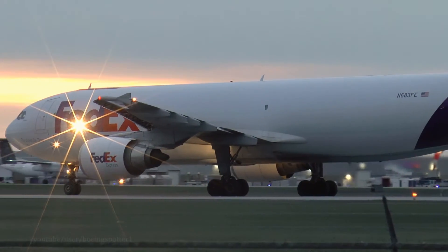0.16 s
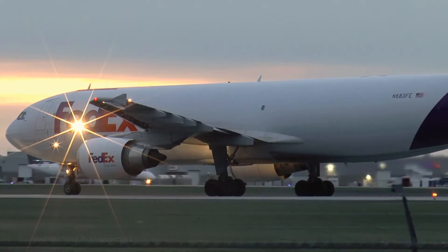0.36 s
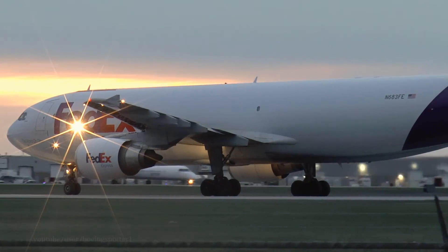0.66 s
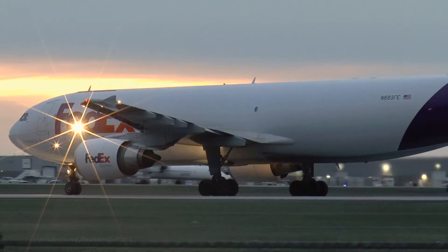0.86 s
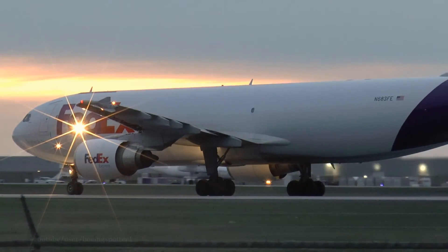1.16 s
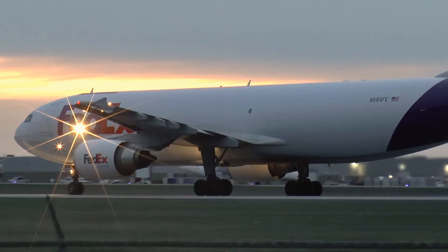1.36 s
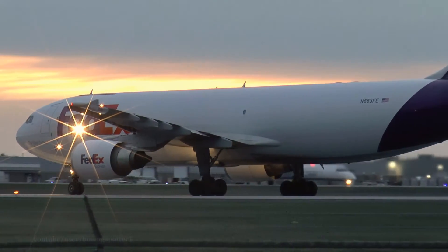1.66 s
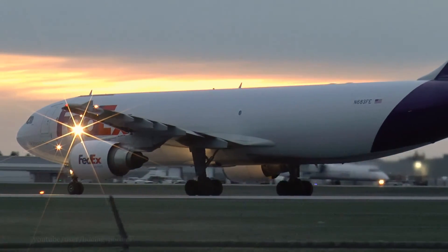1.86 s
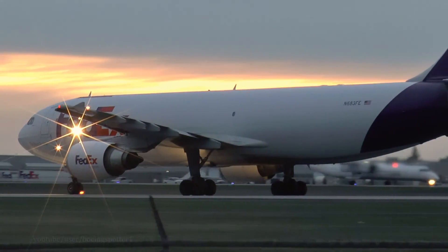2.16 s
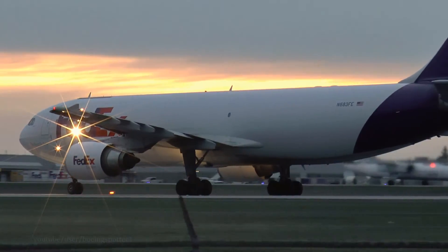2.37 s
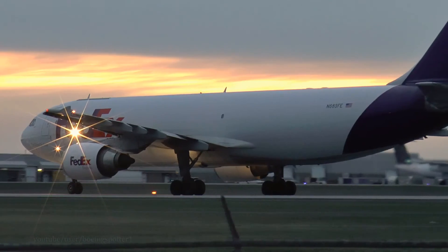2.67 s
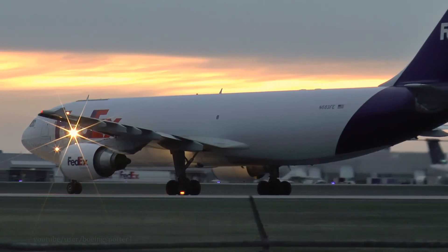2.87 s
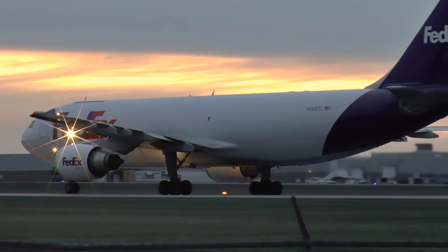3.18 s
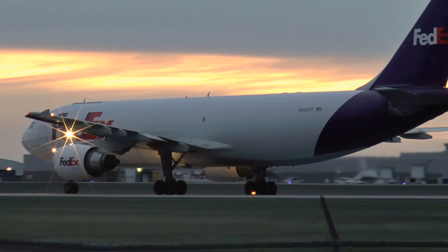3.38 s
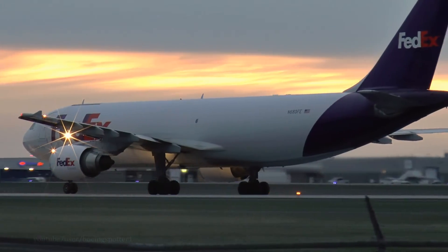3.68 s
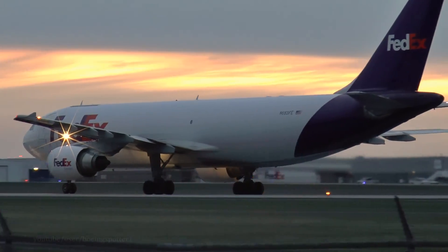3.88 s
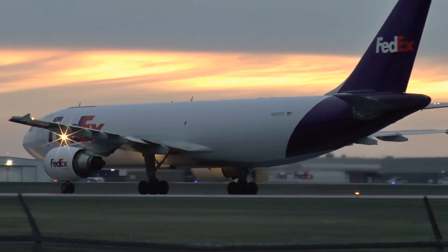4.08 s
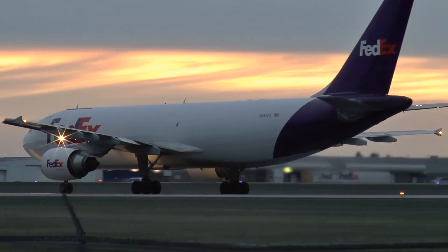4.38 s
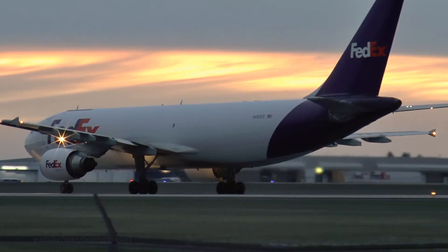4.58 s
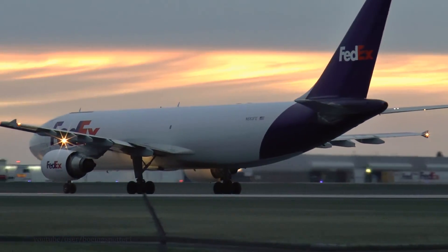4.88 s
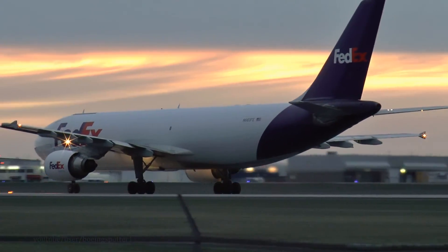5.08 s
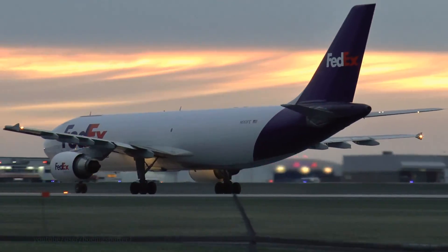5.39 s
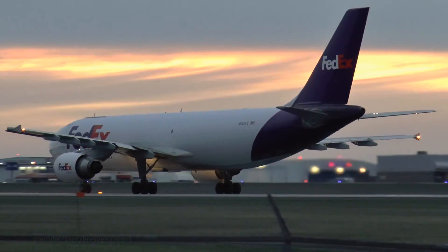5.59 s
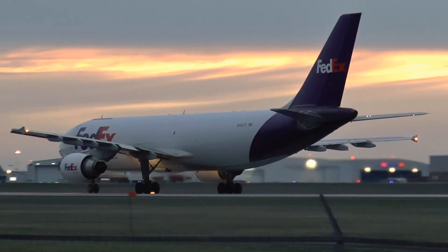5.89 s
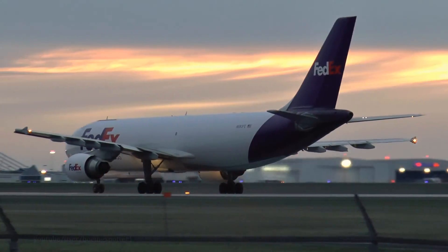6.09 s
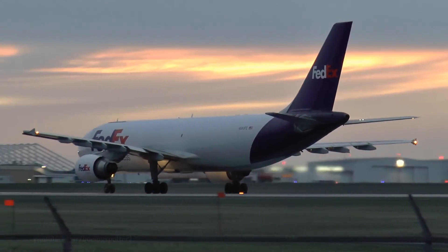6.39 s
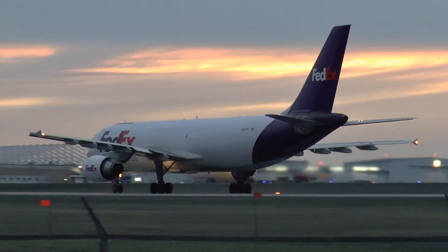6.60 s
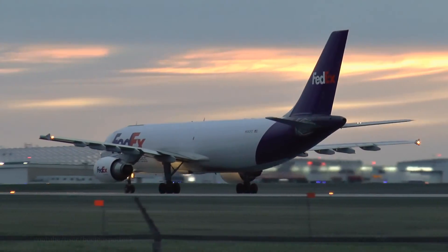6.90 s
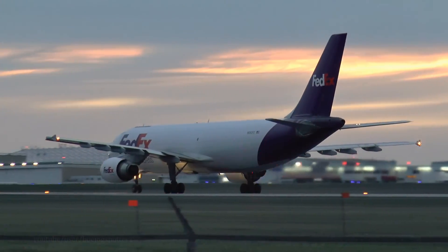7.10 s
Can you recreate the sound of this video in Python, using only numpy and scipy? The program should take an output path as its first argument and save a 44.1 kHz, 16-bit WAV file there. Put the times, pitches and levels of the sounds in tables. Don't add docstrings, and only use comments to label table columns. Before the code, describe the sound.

A large twin-jet airliner rolls past on takeoff with a rising fan whine and a deep, crackling, overloaded rumble that grows duller as it recedes.

```python
import sys
import numpy as np
from scipy import signal
from scipy.fft import rfft, irfft, next_fast_len
from scipy.io import wavfile

SR = 44100
rng = np.random.default_rng(int(sys.argv[2]) if len(sys.argv) > 2 else 0)


def invert_db(level):
    return 10 ** (np.asarray(level, dtype=float) / 20)


def to_wav(sig):
    pcm = np.clip(np.atleast_2d(sig), -1, 1) * 32767
    pcm = np.round(pcm).astype(np.int16)
    wavfile.write(sys.argv[1], SR, pcm.T)


N = 319725


def rms_one(x):
    return x / np.sqrt(np.mean(x ** 2) + 1e-20)


def in_time(rows):
    time_s, *columns = np.transpose(rows)
    return [np.interp(np.arange(N) / SR, time_s, column) for column in columns]


def at_hz(points, hz):
    table_hz, table_db = np.transpose(points)
    return np.interp(np.log(hz + 1e-9), np.log(table_hz), table_db)


def drift(rate_hz):
    r = np.exp(-80 * np.pi * rate_hz / SR)
    slow = signal.lfilter([1], [1, -2 * r, r * r], rng.standard_normal(N // 40 + 2002))[2000:]
    return np.interp(np.arange(N) / 40, np.arange(len(slow)), rms_one(slow))


def one_pole(x, seconds):
    r = np.exp(-1 / (seconds * SR))
    return signal.lfilter([1 - r], [1, -r], x)


def white():
    size = next_fast_len(N)
    return rfft(rng.standard_normal(size)), np.arange(size // 2 + 1) * SR / size, size


# time_s, level_db
RUMBLE_LEVEL = [
    (0.0, -19.5),
    (0.5, -17),
    (1.0, -16),
    (2.0, -14.5),
    (3.0, -14.5),
    (3.7, -12.5),
    (4.6, -16.5),
    (5.9, -16),
    (6.7, -16),
    (7.25, -15),
]
# pitch_hz, level_db (per Hz)
RUMBLE_NEAR_SPECTRUM = [(15, -20.5), (25, -12), (40, -9.5), (60, -5.5), (85, -0.5), (120, -1.5),
                        (160, -5.5), (200, -6.5), (250, -16), (330, -37.5)]
# pitch_hz, level_db (per Hz)
RUMBLE_FAR_SPECTRUM = [(15, -11.5), (25, -7.5), (40, -6), (60, 2), (85, 2), (120, -5.5), (160, -9),
                       (200, -19), (250, -27), (330, -45)]
# time_s, gain_drop_db (negative:
STRONG_CRESTS = [(0.3735, 5.5, -1), (0.615, 0.5, -1), (0.8669, 1.45, -1), (1.0386, 2, -1), (1.3311, 3, -1),
                 (1.4984, 1, 1), (1.7323, 2.5, -1), (1.8558, 2, -1), (2.1089, 2, -1), (2.2396, 1.5, -1),
                 (2.3581, 2.5, -1), (2.458, 1, -1), (2.6142, 1, -1), (2.8608, 3, -1), (3.2086, 1.5, -1),
                 (3.3896, 2.5, 1), (3.517, 1.8, 1), (3.699, 2, -1), (3.8546, 0.9, -1), (4.1106, 1.5, -1),
                 (4.737, 1.5, 1), (4.9024, 2.5, -1), (5.1828, 3, -1), (5.347, 1, -1), (5.654, 3.5, -1),
                 (6.0966, 3.2, -1), (6.6688, 0.4, 1), (6.716, 1.5, 1), (6.8372, 4, -1), (7.2485, -1.5, -1)]
CREST_HZ, CREST_SINK_HZ_PER_S = 110, 3.0
CEILING, BOTTOM = 0.61, -0.5


def rumble(crest_cycles, crest_db, per_db, swing):
    noise, hz, size = white()
    noise = noise * (hz < 345)
    near = rms_one(irfft(noise * invert_db(at_hz(RUMBLE_NEAR_SPECTRUM, hz)), size)[:N])
    far = rms_one(irfft(noise * invert_db(at_hz(RUMBLE_FAR_SPECTRUM, hz)), size)[:N])
    farness = 1.075 * np.linspace(0, 1, N) ** 0.67 - 0.1
    eddies = near + farness * (far - near)

    swell = np.sqrt(signal.filtfilt(*signal.butter(1, 18.0, fs=SR), eddies ** 2).clip(0))
    eddies = rms_one(eddies / (1 + (swell / swing) ** 4) ** 0.17)
    eddies = signal.sosfilt(signal.butter(3, 31.0, "high", fs=SR, output="sos"), eddies)
    out = invert_db(in_time(RUMBLE_LEVEL)[0] + 3.5) * eddies

    around = np.arange(-1500, 1500)
    t = around / SR
    gain = gain_control()
    for time_s, drop_db, direction in STRONG_CRESTS + lesser_crests():
        crest_hz = CREST_HZ - CREST_SINK_HZ_PER_S * time_s
        at = round(time_s * SR) + around
        window = np.exp(-0.5 * (t * crest_hz / crest_cycles) ** 2)
        limit = CEILING if direction > 0 else BOTTOM
        height = invert_db(crest_db + per_db * drop_db) * limit / gain[at[1200]]
        crest = height * np.cos(2 * np.pi * crest_hz * t)
        inside = at < N
        at = at[inside]
        out[at] += window[inside] * (crest[inside] - out[at])
    return out


def lesser_crests():
    strong_s = np.array(STRONG_CRESTS)[:, 0]
    rows, time_s = [], 0
    for spread, side in rng.random((80, 2)):
        time_s += 0.09 * 1.18 ** time_s * (0.5 + spread)
        clear = abs(strong_s - time_s).min() > 0.035
        if clear and 0.04 < time_s < N / SR - 0.05:
            rows.append((time_s, 0, 1 if side < 0.15 else -1))
    return rows


# time_s, level_db, distance (0 near, 1 far)
ROAR_PATH = [
    (0.0, -29.5, 0.028),
    (0.58, -27.5, 0.075),
    (2.5, -29.5, 0.52),
    (3.1, -29.5, 0.55),
    (3.9, -31.5, 0.82),
    (4.55, -32.5, 0.94),
    (5.15, -33.5, 0.83),
    (6.2, -36, 0.86),
    (6.65, -33, 0.91),
    (7.25, -36, 0.9),
]
# pitch_hz, level_db (per Hz)
ROAR_NEAR_SPECTRUM = [(300, -9.5), (700, -5), (1250, -0.5), (1650, -2), (2200, -10.5), (2800, -11.5),
                      (3600, -9), (4100, -17.5), (5000, -23), (5500, -27.5), (6200, -31.5), (6800, -33.5),
                      (8500, -47.5), (11000, -68.5)]
# pitch_hz, level_db (per Hz)
ROAR_FAR_SPECTRUM = [(300, -5), (700, -4.5), (1250, 0.5), (1650, 1), (2200, -4), (2800, -9), (3600, -13),
                     (4100, -22.5), (5000, -33.5), (5500, -37.5), (6200, -42.5), (6800, -48.5),
                     (8500, -59.5), (11000, -63)]


def roar(patchy_db, gusty_db):
    level_db, far = in_time(ROAR_PATH)
    far = np.clip(far, -0.3, 1.3)
    noise, hz, size = white()
    midway_db = 0.5 * (at_hz(ROAR_NEAR_SPECTRUM, hz) + at_hz(ROAR_FAR_SPECTRUM, hz))
    noise = noise * invert_db(midway_db)
    band_place = 3 * np.log2(hz / 280 + 1e-9)
    out, power, gust = 0, 0, drift(3.6)
    for k in range(17):
        centre_hz = 280 * 2 ** (k / 3)
        overlap = np.clip(1 - abs(band_place - k), 0, 1)
        band = irfft(noise * overlap, size)[:N]
        change_db = at_hz(ROAR_FAR_SPECTRUM, centre_hz) - at_hz(ROAR_NEAR_SPECTRUM, centre_hz)
        gain = invert_db((far - 0.5) * change_db)
        power = power + gain ** 2 * np.mean(band ** 2)
        out = out + band * gain * invert_db(patchy_db * drift(1.8) + gusty_db * gust)
    return invert_db(level_db + 2.0) * out / np.sqrt(power)


# time_s, pitch_hz
BLADE_PITCH = [
    (0, 1636),
    (.55, 1699),
    (1.15, 1761),
    (1.8, 1820),
    (3.2, 1918),
    (4.0, 1950),
    (4.8, 1956),
    (5.9, 1928),
    (7.25, 1898),
]
# time_s, half_width_s, level_db
BLADE_BEAMS = [
    (0.2, 0.26, -33.5),
    (0.62, 0.25, -31.5),
    (1.2, 0.23, -36),
    (2.6, 0.6, -50),
    (5.2, 0.2, -44.5),
    (6.1, 0.39, -42.5),
]
# time_s, half_width_s, level_db
OCTAVE_BEAMS = [
    (0.0, 0.08, -37),
    (0.45, 0.25, -40),
    (0.85, 0.15, -32.5),
    (1.25, 0.17, -44.5),
    (1.51, 0.15, -37),
    (2.8, 0.55, -53),
]
SHADOW_S, SHADOW_POWER, SHADOW_DB_PER_S = 5.0, 4, 12


def fan(lead, other_db, other_s, flutter_db, wobble, higher_db, haystack):
    t = np.arange(N) / SR
    hz = in_time(BLADE_PITCH)[0]
    first_db, second_db = beam_db(BLADE_BEAMS), beam_db(OCTAVE_BEAMS)
    other_fade_db = other_db - 10 * t / other_s
    out = 0
    for speed, db in ((1, 0), (1 + lead, other_fade_db)):
        phase = 2 * np.pi * np.cumsum(hz * speed * (1 + wobble * drift(15.0))) / SR
        out = out + invert_db(first_db + db + flutter_db * drift(12.0)) * np.sin(phase)
        out = out + invert_db(second_db + db + flutter_db * drift(8.9)) * np.sin(2 * phase)

    blurred_phase = 2 * np.pi * np.cumsum(hz * (1 + haystack * drift(150.0))) / SR
    for order, db in zip((3, 4, 5, 6), higher_db):
        hidden_s = t - SHADOW_S * (3 / order) ** SHADOW_POWER
        shadow_db = -SHADOW_DB_PER_S * np.maximum(hidden_s, 0)
        level_db = shadow_db - 1.6 * t + db + 2.0 * drift(60.0)
        out = out + invert_db(level_db) * np.sin(order * blurred_phase)
    return np.sqrt(2) * out


def beam_db(beams):
    t = np.arange(N) / SR
    power = sum(invert_db(db) ** 2 * np.exp(-((t - time_s) / width_s) ** 2) for time_s, width_s, db in beams)
    return 10 * np.log10(power + 1e-9)


RECOVERY_S, ATTACK_S = 0.26, 0.0015


def gain_control():
    drops = np.zeros(N)
    for time_s, drop_db, _ in STRONG_CRESTS:
        drops[round((time_s - 0.1 / CREST_HZ) * SR)] = drop_db
    held_db = signal.lfilter([1], [1, -np.exp(-1 / (RECOVERY_S * SR))], drops)
    return invert_db(-one_pole(held_db, ATTACK_S))


def limiter(x, share, release_db_s):
    overload = np.maximum(x / CEILING, x / BOTTOM)
    over_db = 20 * np.log10(np.maximum(overload, 1))
    ramp_db = release_db_s * np.arange(N) / SR
    held_db = np.maximum.accumulate(share * over_db + ramp_db) - ramp_db
    return invert_db(-one_pole(held_db, ATTACK_S))


def scene():
    jet = rumble(crest_cycles=0.35, crest_db=1.0, per_db=1.01, swing=0.98)
    jet = jet + roar(patchy_db=0.43, gusty_db=0.5)
    jet = jet + fan(lead=0.011, other_db=-1.0, other_s=0.2, flutter_db=0.7, wobble=0.001,
                    higher_db=(-64, -63.5, -79.5, -80.5), haystack=0.03)
    return np.array([jet, jet])


def band_limit(x):
    return signal.sosfilt(signal.butter(12, 15830, fs=SR, output="sos"), x)


def record(dry):
    x = dry * gain_control()
    x = np.clip(x * limiter(x[0], share=0.62, release_db_s=28), BOTTOM, CEILING)
    x = signal.sosfilt(signal.butter(1, 8.0, "high", fs=SR, output="sos"), x)
    bass = signal.sosfiltfilt(signal.butter(4, 200.0, fs=SR, output="sos"), x[0])
    x = x + invert_db(-39) * bass * (1 + 0.2 * drift(8.0)) * [[-1], [1]]
    x = x + invert_db(-86.5) * rng.standard_normal(N)
    x = x + invert_db(-104) * rng.standard_normal((2, N))
    return band_limit(x)


dry = scene()
out = record(dry)
to_wav(out)
```